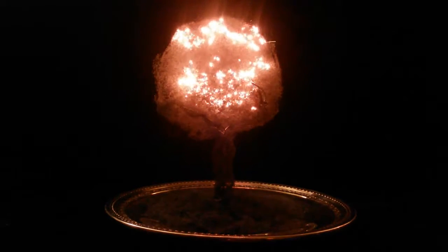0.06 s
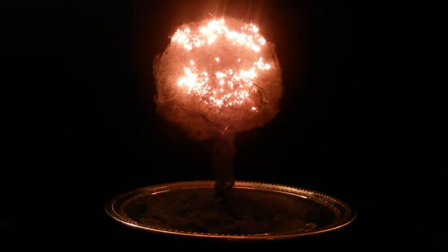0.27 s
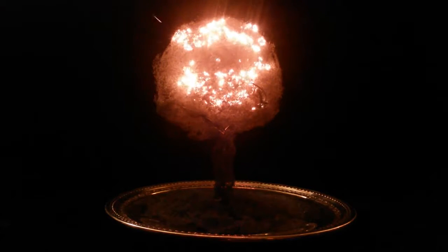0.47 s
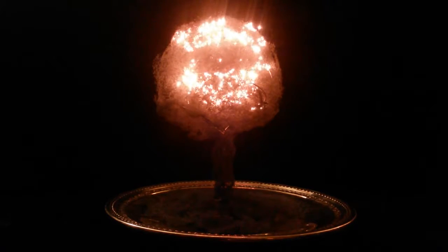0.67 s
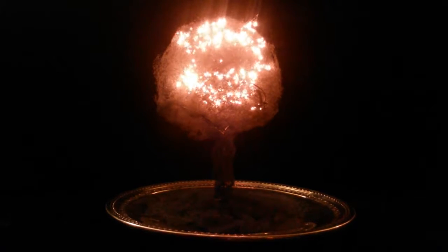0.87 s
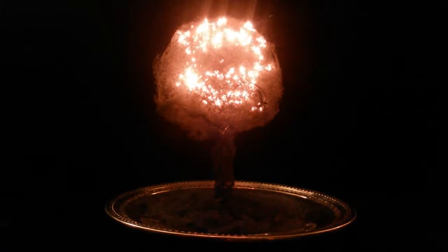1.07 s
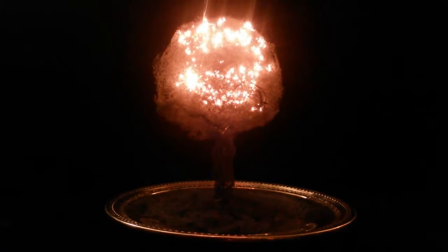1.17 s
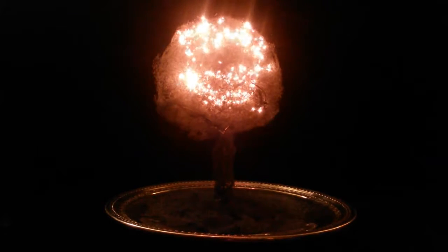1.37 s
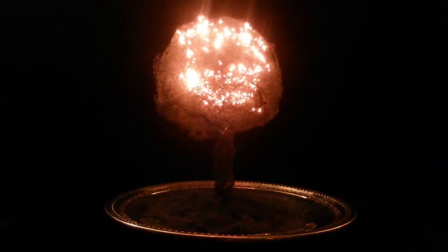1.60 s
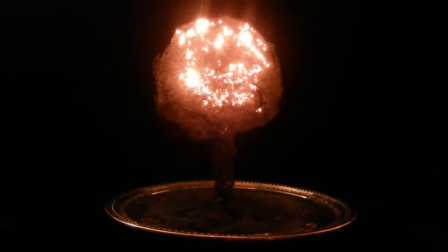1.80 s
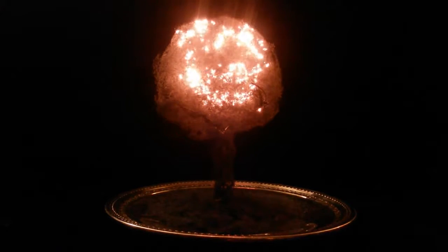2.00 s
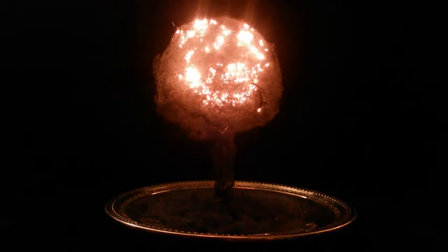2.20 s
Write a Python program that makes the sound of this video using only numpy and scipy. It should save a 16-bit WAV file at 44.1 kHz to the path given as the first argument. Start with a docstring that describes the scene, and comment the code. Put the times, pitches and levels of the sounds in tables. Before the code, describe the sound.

Smouldering steel wool hisses faintly, with two groups of dull thumps like footsteps on wood.

```python
"""A ball of steel wool smoulders in a quiet room: a faint hiss, with tiny sparks that ring the
microphones near 9 kHz. At about 0.2 s and again at 0.8 s, a stumbling group of dull thumps, like
footfalls on a wooden floor, booms through the room. The hiss swells after each group and sinks back.
Soft scuffs and creaks of the camera body come mostly after the second group, and one last faint
thump falls near 1.8 s."""
import sys
import numpy as np
from scipy import signal
from scipy.fft import rfft, irfft
from scipy.io import wavfile
from scipy.ndimage import uniform_filter1d

SR = 44100
rng = np.random.default_rng(int(sys.argv[2]) if len(sys.argv) > 2 else 0)


def waveform_to_disk(signal):
    """Save audio, clipped to [-1, 1], as 16-bit WAV at the path in sys.argv[1]."""
    frames = np.transpose(np.atleast_2d(signal))
    scaled = np.clip(frames, -1, 1) * 32767
    samples = np.round(scaled).astype(np.int16)
    wavfile.write(sys.argv[1], SR, samples)


N = 99225  # 2.25 s

# Tone colour of the hiss (frequency [Hz], relative level [dB])
HISS_COLOUR = [(200, 8.5), (500, 6.5), (900, 3.5), (1500, 1), (2500, -0.5), (4200, 0), (6500, 2.5),
               (8000, 4), (10000, 0.5), (13000, 3.5), (14500, 0)]
# Slow rise and fall of the hiss, fizz and room tone (time [s], level change [dB])
SWELL_CURVE = [(0, -8), (.19, -6), (.31, -1.6), (.43, 0.2), (0.529, -2.5), (0.621, -3), (.81, -3.5),
               (.89, -0.7), (1.03, 1.3), (1.25, 0.4), (1.47, -0.5), (1.52, -4.5), (1.85, -5.5),
               (2.08, -5.5), (2.25, -4)]
# Sparks that stand out as clear ticks (time [s], level [dB])
CLEAR_SPARKS = [(0.1323, -50.5), (.5841, -42.5), (1.093, -52), (1.1293, -49), (1.153, -47), (1.2438, -36),
                (1.8642, -44.5), (1.8814, -48)]
# Footfalls; a "fade" is the time taken to drop by 60 dB
# (time [s], level [dB], ring pitch [Hz], ring fade [s], relative boom level [dB], boom fade [s])
FOOTFALLS = [(.220, -37, 133.5, 0.28, -2.5, 0.48), (.242, -35, 162.5, 0.39, -3.5, 0.47),
             (.321, -43.5, 125.8, 0.42, -2, 0.57), (.365, -42, 180.4, 0.46, -7, 0.56),
             (.453, -49, 97.6, .3, -10, 0.34), (0.502, -51.5, 113.3, 0.35, -10, 0.27),
             (.824, -37, 152, 0.39, -0.5, 0.57), (0.857, -39.5, 88.6, .15, -6, 0.21),
             (.917, -41, 120.6, 0.21, -1, 0.68), (.946, -38, 138.8, 0.35, 1, 0.22),
             (1.046, -38.5, 131.8, 0.31, -6, 0.63), (1.086, -40, 159.5, 0.73, -9, .5),
             (1.126, -42.5, 126.6, 0.52, -10, 0.42), (1.227, -46, 90.6, .35, -10.5, 0.58),
             (1.294, -49.5, 134.9, 0.44, 0, 0.44), (1.793, -58.5, 129.4, 0.89, -7, 0.4)]
# Notes the floor rings at when struck (pitch [Hz], relative level [dB], fade [s])
FLOOR_NOTES = [(67, -10, 0.41), (90.6, 3, .25), (121.5, -4.5, 0.64), (160.9, -3, 0.37), (249.3, 6.5, 0.067),
               (304, -6, 0.094)]
# Tone colour of the room's boom (frequency [Hz], relative level [dB])
BOOM_COLOUR = [(30, -45), (48, -37), (65, -11.5), (95, 2), (125, 2.5), (162, 3.5), (195, -3.5), (245, -5.5),
               (310, -15.5), (420, -23), (600, -35.5), (1200, -44), (3000, -53.5), (8000, -83)]
# Soft scuffs (time [s], level [dB], time before fading [s], relative level of the low part [dB])
SOFT_SCUFFS = [(0.074, -74, 0.0093, 11), (0.702, -61, 0.017, 3.5), (0.82, -66, 0.083, 8),
               (0.903, -72, 0.26, 9.5), (1.315, -59.5, 0.037, 5.5), (1.361, -62.5, 0.015, 14),
               (1.44, -62, 0.022, 9.5), (1.571, -62.5, 0.0048, -2.5), (1.691, -66.5, 0.011, 6),
               (1.789, -66, 0.016, 9.5), (2.129, -66.5, .015, 7), (2.186, -67, 0.05, 10),
               (2.212, -61, 0.014, 2.5)]
# Tone colour of a scuff's rub (frequency [Hz], relative level [dB])
RUB_COLOUR = [(150, -7.5), (350, 4.5), (600, -1), (1000, -3), (1500, -5), (2600, -9.5), (4000, -24),
              (7000, -30), (14000, -23)]
# Tone colour of a scuff's low part (frequency [Hz], relative level [dB])
SCUFF_LOW_COLOUR = [(40, -32), (80, -2.5), (130, 9.5), (190, -5), (240, -3), (300, -11), (370, -5.5),
                    (470, -19), (620, -29.5), (2000, -34.5)]
# Creaks of the camera body (time [s], level [dB])
CAMERA_CREAKS = [(.707, -63), (.832, -66), (.874, -63), (1.3235, -63), (1.3335, -52), (1.3475, -65),
                 (1.371, -53), (1.448, -57), (1.576, -54), (2.216, -54)]
# Tone colour of the room's rumble (frequency [Hz], relative level [dB])
RUMBLE_COLOUR = [(20, -5), (42, -7.5), (65, -2.5), (120, 2), (170, -2.5), (240, -4), (330, -15.5),
                 (500, -19), (900, -45), (2500, -66)]
# Faint tones in the room (pitch [Hz], level [dB])
HUM_TONES = [(827, -90), (1050, -96.5), (1209, -94.5), (1565, -96), (1634, -95.5), (1928, -100.5),
             (2003, -95), (2136, -103), (2225, -96.5)]
# How alike left and right sound (frequency [Hz], likeness [1 = same, 0 = unrelated, -1 = opposite])
STEREO_LIKENESS = [(60, .99), (150, .98), (300, 0.9), (600, 0.39), (1000, 0.48), (1300, -0.13),
                   (2000, -0.22), (3200, 0.2), (5000, -0.11), (8000, -0.089), (14000, -0.004)]

MIC_RING_HZ, MIC_WIDTH_HZ, MIC_BOOST_DB = (8770, 8300), (610, 2200), (13.5, 3)  # each (left, right)
HISS_DB, HISS_RIGHT_DB, HISS_FLICKER_DB = -59.5, -2.5, 0.7
SPARK_RISE_S, SPARK_RING_S, SPARK_RIGHT_DB = 0.00025, 0.00026, -10.5
FIZZ_PER_S, FIZZ_DB, FIZZ_SPREAD_DB = 260, -72.5, 6.5
THUMP_RISE_S, BOOM_RISE_S, FLOOR_DB = 0.0079, 0.0069, -12.5
SCUFF_RISE_S, SCUFF_DROP_S, SCUFF_ECHO_FADE_S, SCUFF_ECHO_SHARE = 0.005, 0.017, 0.33, 0.83
CAMERA_RING_HZ, CAMERA_WIDTH_HZ, CAMERA_RING_DB = 2016, 600, -11
CREAK_RISE_S, CREAK_RING_S = 0.0022, 0.0029
RUMBLE_DB, ROOM_LEFT_DB = -57.5, -2
BASS_CUT_HZ, TREBLE_CUT_HZ = 52, 14560

TIMES, FREQS = np.arange(N) / SR, np.fft.rfftfreq(N, 1 / SR)  # [s], [Hz]


def wool_hiss():
    """The smouldering wool hisses, and each microphone boosts the pitches it rings at."""
    boosts = np.array([np.sqrt(1 + amp(db) ** 2 / off_pitch(hz, width) ** 1.39)
                       for hz, width, db in zip(MIC_RING_HZ, MIC_WIDTH_HZ, MIC_BOOST_DB)])
    left, right = irfft(rfft(noise(HISS_COLOUR)) * boosts, N)
    hiss = np.array([unit(left), amp(HISS_RIGHT_DB) * unit(right)])
    return hiss * amp(HISS_DB + swell_db() + HISS_FLICKER_DB * wobble(samples=200))


def sparks():
    """Tiny snaps ring each microphone for about a millisecond: a few clear ticks over a fine fizz."""
    rings = np.array([ping(TIMES[:256], hz, SPARK_RISE_S, SPARK_RING_S) for hz in MIC_RING_HZ])
    rings[1] *= amp(SPARK_RIGHT_DB)
    fires = rng.random(N) < FIZZ_PER_S / SR
    extra_db = FIZZ_SPREAD_DB * np.minimum(rng.exponential(1, N), 4)  # most snaps are weak
    snaps = fires * amp(FIZZ_DB + swell_db() + extra_db)
    for start, db in CLEAR_SPARKS:
        snaps[round(start * SR)] += amp(db)
    return signal.oaconvolve(snaps[None], rings, axes=1)[:, :N]


def footfalls():
    """Each footfall rings at its own low pitch, shakes the floor and makes the room boom."""
    knocks, boom_power = np.zeros(N), np.zeros(N)
    for start, db, ring_hz, ring_fade, boom_db, boom_fade in FOOTFALLS:
        t = since(start)
        ring = amp(-60 * t / ring_fade) * np.sin(2 * np.pi * ring_hz * t)
        floor = sum(amp(note_db - 60 * t / fade) * np.sin(2 * np.pi * hz * t)
                    for hz, note_db, fade in FLOOR_NOTES)
        knocks += amp(db) * np.minimum(t / THUMP_RISE_S, 1) * (ring + amp(FLOOR_DB) * floor)
        boom_power += (amp(db + boom_db - 60 * t / boom_fade) * np.minimum(t / BOOM_RISE_S, 1)) ** 2
    return knocks + np.sqrt(boom_power) * steady(noise(BOOM_COLOUR))


def scuffs():
    """Short, grainy rubs with a low part linger in the room and set the camera body ringing."""
    rub_power, low_power = np.zeros(N), np.zeros(N)
    for start, db, hold, low_db in SOFT_SCUFFS:
        after = since(start + hold)
        direct = (1 - SCUFF_ECHO_SHARE) * np.exp(-after / SCUFF_DROP_S)
        echo = SCUFF_ECHO_SHARE * amp(-60 * after / SCUFF_ECHO_FADE_S)
        level = amp(db) * np.minimum(since(start) / SCUFF_RISE_S, 1) * (direct + echo)
        rub_power += level ** 2
        low_power += (level * amp(low_db)) ** 2
    grain = unit(amp(wobble(samples=130)))  # about 1 dB of roughness
    ring = amp(CAMERA_RING_DB) * camera_ring()
    rub = np.sqrt(rub_power) * grain * (noise(RUB_COLOUR) + np.array([ring, -ring]))
    return rub + np.sqrt(low_power) * steady(noise(SCUFF_LOW_COLOUR))


def camera_ring():
    """The rubbed camera body picks out a narrow band of noise around its own pitch."""
    spectrum = rfft(rng.standard_normal(N))
    return unit(irfft(spectrum / off_pitch(CAMERA_RING_HZ, CAMERA_WIDTH_HZ), N))


def camera_creaks():
    """Tiny slips rock the camera body, moving its two microphones in opposite directions."""
    creaks = sum(amp(db) * ping(since(start), CAMERA_RING_HZ, CREAK_RISE_S, CREAK_RING_S)
                 for start, db in CAMERA_CREAKS)
    return np.array([creaks, -creaks])


def room_tone():
    """A low rumble and a few faint tones swell along with the hiss."""
    hum = sum(amp(db) * np.sqrt(2) * np.sin(2 * np.pi * (hz * TIMES + rng.random()))
              for hz, db in HUM_TONES)
    rumble = amp(RUMBLE_DB + swell_db()) * steady(noise(RUMBLE_COLOUR), samples=4000)
    return rumble + hum * unit(amp(swell_db()))


def swell_db():
    """The slow rise and fall of the hiss at every moment, in dB."""
    return np.interp(TIMES, *np.transpose(SWELL_CURVE))


def ping(t, hz, rise_s, ring_s):
    """A tone that starts smoothly and dies away."""
    shape = (1 - np.exp(-(t / rise_s) ** 2)) * np.exp(-t / ring_s)
    return shape / shape.max() * np.sin(2 * np.pi * hz * t)


def off_pitch(hz, width):
    """Is 1 at the given pitch and grows on both sides, so dividing by it makes a peak."""
    return 1 + ((FREQS - hz) / width * 2) ** 2


def noise(colour):
    """Stereo noise with the given tone colour, alike in both ears in the bass."""
    left, other = rfft(rng.standard_normal((2, N)))
    likeness = np.clip(curve(STEREO_LIKENESS), -1, 1)
    right = likeness * left + np.sqrt(1 - likeness ** 2) * other
    return unit(irfft(np.array([left, right]) * amp(curve(colour)), N))


def curve(table):
    """Joins a table's points to give a value at every frequency (on a log scale)."""
    hz, value = np.transpose(table)
    return np.interp(np.log(FREQS + 1), np.log(hz + 1), value)


def wobble(samples):
    """A random wiggle; more samples make it slower."""
    return unit(uniform_filter1d(rng.standard_normal(N), size=samples))


def steady(x, samples=1800):
    """Evens out slow chance swells in noise and keeps the fast flutter."""
    power = uniform_filter1d(uniform_filter1d((x ** 2).mean(0), samples), samples // 2)
    return x / np.sqrt(abs(power) + 1e-9)


def since(start):
    """Seconds since start, zero before it."""
    return np.maximum(TIMES - start, 0)


def amp(db):
    """Turns decibels into a number to multiply by."""
    return 10 ** (np.asarray(db) / 20)


def unit(x):
    """Scales a signal to an average strength (rms) of 1."""
    return x / np.sqrt(np.mean(x ** 2) + 1e-20)


def scene():
    """Room sounds lean to the right, the burning wool to the left."""
    room = footfalls() + scuffs() + camera_creaks() + room_tone()
    return room * amp([[ROOM_LEFT_DB], [0]]) + wool_hiss() + sparks()


def record(dry):
    """The microphones lose the deepest bass, then the highest treble is cut off."""
    bass_cut = signal.butter(3, BASS_CUT_HZ, "highpass", fs=SR, output="sos")
    treble_cut = signal.firwin(1023, TREBLE_CUT_HZ, window=("kaiser", 9), fs=SR)
    return signal.oaconvolve(signal.sosfilt(bass_cut, dry), treble_cut[None], "same")


dry = scene()
out = record(dry)
waveform_to_disk(out)
```